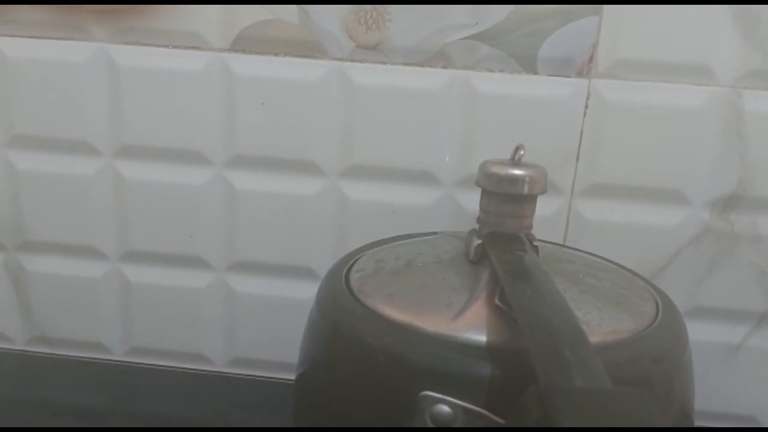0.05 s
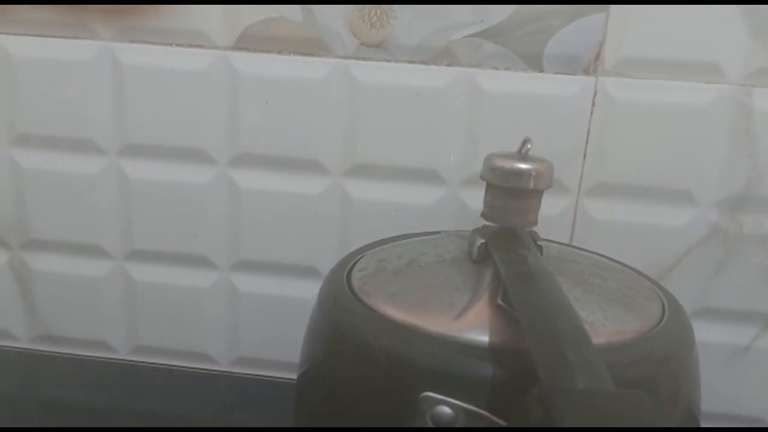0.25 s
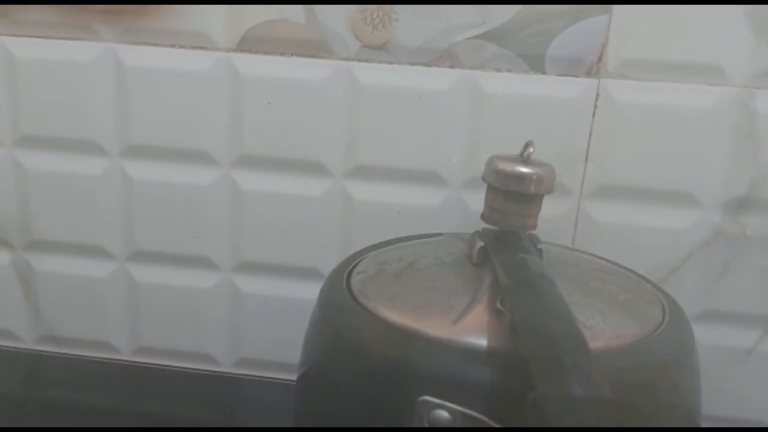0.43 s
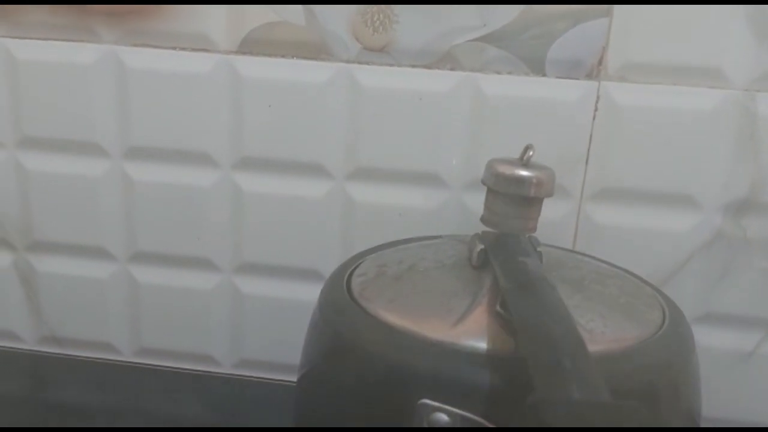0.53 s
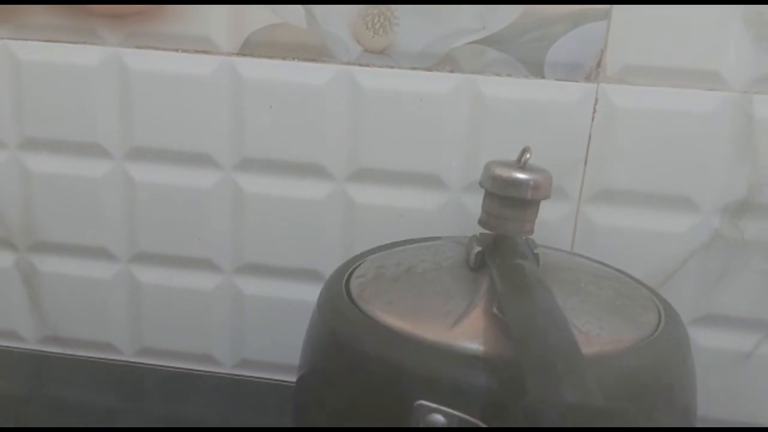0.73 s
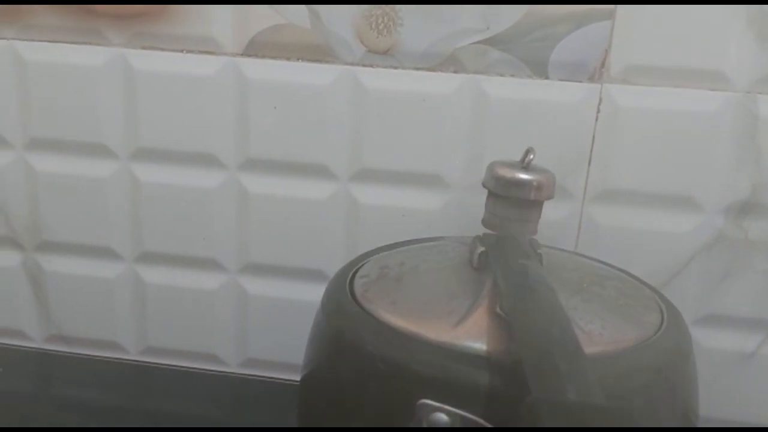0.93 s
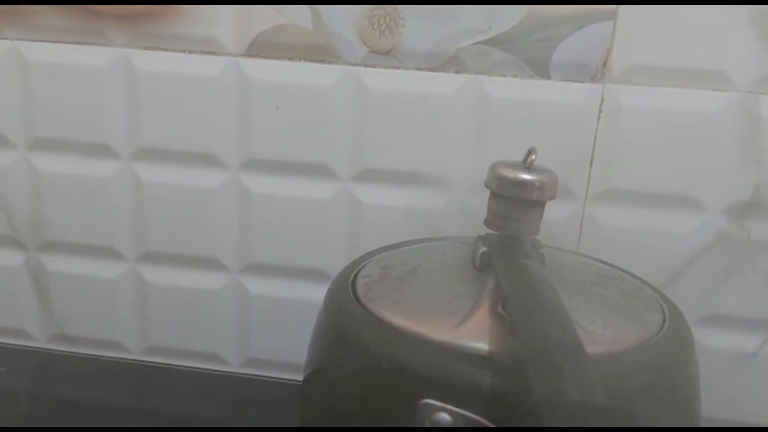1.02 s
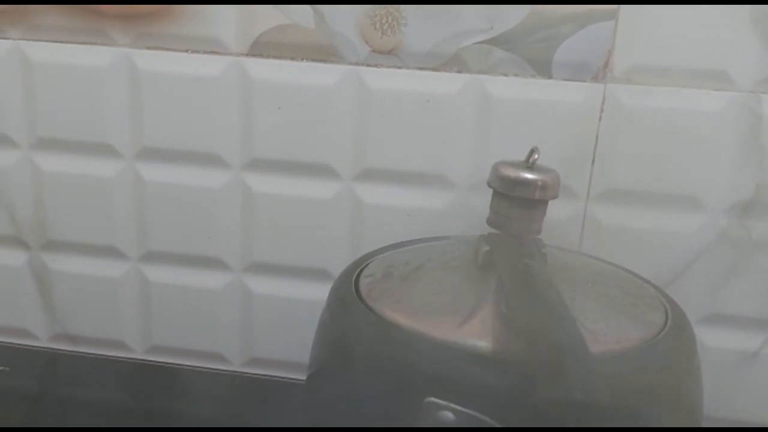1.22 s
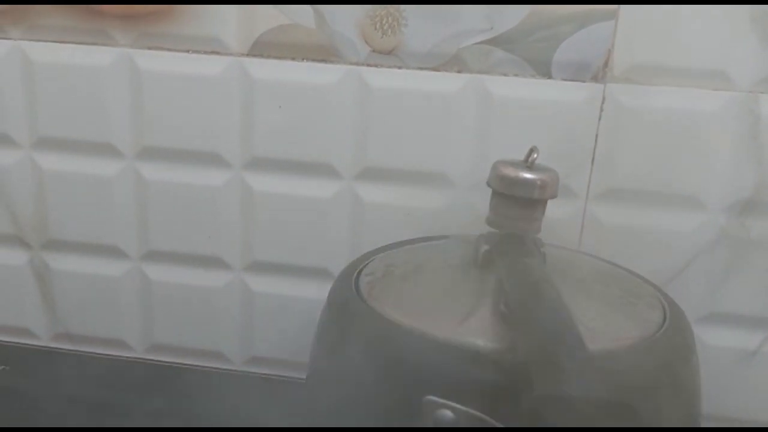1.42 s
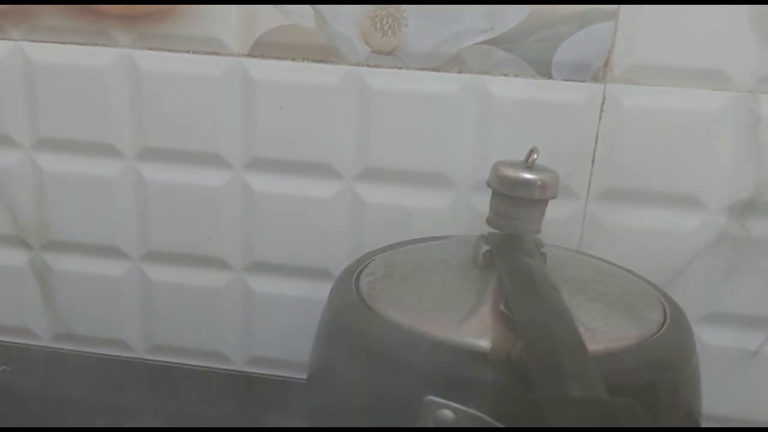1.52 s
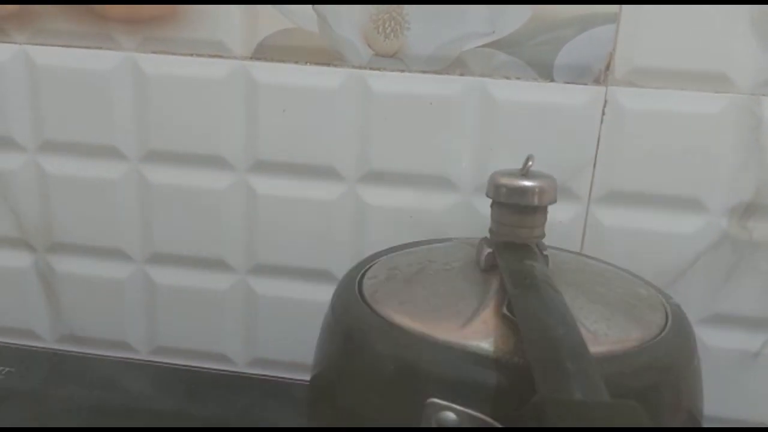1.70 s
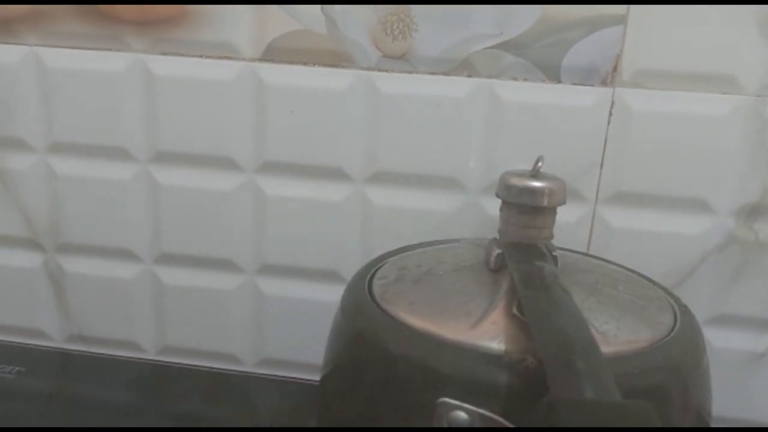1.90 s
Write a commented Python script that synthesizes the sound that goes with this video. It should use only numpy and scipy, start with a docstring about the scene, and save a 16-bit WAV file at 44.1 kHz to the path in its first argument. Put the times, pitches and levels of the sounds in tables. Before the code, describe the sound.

Steam hisses loudly from a pressure cooker valve with a gusty rumble, then shuts off.

```python
"""A steam jet leaves a pressure cooker's vent for a second and a half, as the weight lifts and drops shut.
Its turbulence hisses and excites the cap's resonances; the weight ticks, steam spits, the valve whistles.
The cloud blows over the two microphone ports of a nearby phone, rumbling and thumping mostly on the left.
A thin leak, a quiet kitchen and a faint tone remain."""
import sys
import numpy as np
from scipy import signal
from scipy.fft import rfft, irfft
from scipy.io import wavfile
from scipy.ndimage import uniform_filter1d

SR = 44100
rng = np.random.default_rng(int(sys.argv[2]) if len(sys.argv) > 2 else 0)


def wrap_up_sound(samples):
    """Save the sound to the file named by the first command line argument, as 16-bit audio."""
    columns = np.atleast_2d(samples).T
    # keep every value between -1 and 1, then stretch to whole-number steps
    tamed = np.clip(columns, -1, 1)
    steps = np.round(tamed * 32767).astype(np.int16)
    wavfile.write(sys.argv[1], SR, steps)


N = 85995
TIME_S = np.arange(N) / SR
BIN_HZ = np.arange(N // 2 + 1) * SR / N + 1  # raised 1 Hz to keep logarithms finite
PORT_LAG_S = .00018


def steam_jet():
    """Turbulent mixing radiates broadband hiss; the cap's resonances filter the lower of two layers."""
    # flow through the vent (time [s], relative high hiss level [dB], relative low hiss level [dB])
    flow = [(0.0, -49.5, -49), (0.168, -39, -41.5), (0.194, -31, -35.5), (0.216, -35, -39),
            (0.232, -30.5, -34), (0.248, -31.5, -36), (0.266, -24, -28), (0.276, -29.5, -28),
            (0.296, -19.5, -24), (0.325, -20, -26), (0.355, -15.5, -24), (0.482, -20, -26),
            (0.504, -19, -28.5), (0.65, -17.5, -25), (0.976, -19, -25), (0.994, -20, -29),
            (1.036, -17.5, -24), (1.226, -20, -31), (1.242, -19, -26), (1.548, -19.5, -26),
            (1.564, -19, -24), (1.72, -32.5, -37.5), (1.738, -42, -43), (1.758, -31, -38.5),
            (1.824, -56, -55.5), (1.95, -55, -75)]
    # spectra of the two layers (frequency [Hz], left gain [dB], right gain [dB])
    high_spectrum = [(7460, -24, -24), (8600, -13, -12), (9500, -9, -7), (10200, -6, -1.5), (10600, -4, -3),
                     (11300, 0, 0), (12600, 0.5, 1), (13000, -2, -2), (14000, 0.5, 0.5), (15000, -2, -0.5),
                     (16000, -4, -2.5)]
    low_spectrum = [(208, -3, -3.5), (905, -9.5, -14), (1580, 2.5, -6.5), (2880, -1.5, -3.5), (3450, 2, -1),
                    (5500, 4, -5.5), (6040, -0.5, -1.5), (8200, 4, 1), (9400, -21, -50)]
    # cap resonances (frequency [Hz], bandwidth [Hz], left boost [dB], right boost [dB])
    cap = [(2070, 880, 2.5, 3.5), (4640, 410, 5, 10.5), (7600, 250, 6.5, 3)]
    high = colour(noise(coherence=.71), high_spectrum) * undb(curve(flow, column=1) + 3)
    low = colour(noise(coherence=.39, lag_s=PORT_LAG_S), low_spectrum, cap)
    low *= undb(curve(flow, column=2) + 1.5)
    return flutter(high + low, swell_db=.3, band_db=.7, rate_hz=20, grain_db=1.2, grain_hz=350)


def ticks_and_spits():
    """Ticks of the weight and spits of steam, each a short puff with a brief ring of damped modes."""
    # ticks and spits (time [s], relative level [dB], upper cutoff of the puff [Hz])
    transients = [(0.176, -43, 9000), (0.195, -46, 12000), (.231, -38, 12000), (0.264, -45, 9000),
                  (0.291, -22.5, 6000), (0.348, -21, 12000), (1.36, -18, 4000), (1.57, -18, 4000),
                  (1.636, -25, 3500), (1.73, -30.5, 3000)]
    # modes of the weight (frequency [Hz], relative level [dB], T60 [s])
    modes = [(1005, -8, 0.037), (1606, 0, 0.037), (2270, -5, 0.16), (3030, -7, 0.035)]
    puff_t60_s, out = 0.018, 0
    for start, db, top_hz in transients:
        age = np.clip(TIME_S - start, 0, 1)
        envelope = (TIME_S > start) * undb(db - 4 - 60 * age / puff_t60_s)
        band = signal.butter(2, [800, top_hz], "band", fs=SR, output="sos")
        puff = signal.sosfilt(band, noise(coherence=.43) * envelope)
        ring = sum(np.sin(2 * np.pi * hz * age) * undb(db - 7 + mode_db - 60 * age / t60)
                   for hz, mode_db, t60 in modes)
        out = out + puff + ring
    return out


def port_eddies():
    """Wind noise: eddies in the steam cloud make independent pressure fluctuations at each port."""
    # draught (time [s], relative level [dB], left minus right [dB], relative rumble gain [dB])
    draught = [(0.24, -57, 5, -2), (0.284, -52, 5, -10), (0.334, -42.5, 0, 4), (0.366, -29.5, 9.0, -11),
               (0.4, -23, 13.5, 1), (0.478, -23.5, 9.5, -4), (0.512, -24, 11.5, -3),
               (0.664, -22.5, 6, -5.5), (0.726, -22.5, 10, -3.5), (0.916, -23.5, 10.5, 0),
               (0.982, -23.5, 15, 0.5), (1.088, -24, 6, -3), (1.126, -21, 10.5, -1.5),
               (1.192, -21.5, 11, -0.5), (1.302, -29, -2, 0), (1.356, -25, 4, -8.5), (1.39, -23, 8, -3.5),
               (1.566, -22, 16, -4), (1.582, -24.5, 18.5, 0.5), (1.616, -34.5, 11, -4),
               (1.636, -30.5, 21, -5), (1.654, -46, 12, 0), (1.674, -51, 13, -10), (1.72, -44, 7, -1)]
    # eddy spectrum (frequency [Hz], left gain [dB], right gain [dB])
    spectrum = [(25, -30, -9), (61.3, 1, -3), (258, 0.5, 1), (600, -5.5, -3.5), (1560, -7.5, -6.5),
                (3850, -13.5, -10), (5220, -20, -11), (8400, -44, -23)]
    eddies = np.array([flutter(port, swell_db=.7, band_db=.7, rate_hz=16, grain_db=2, grain_hz=400)
                       for port in colour(noise(coherence=0), spectrum)])
    rumble = signal.sosfiltfilt(signal.butter(2, 300, fs=SR, output="sos"), eddies)
    eddies = eddies - rumble + rumble * undb(curve(draught, column=3) + 1.4)
    pan_db = curve(draught, column=2)
    balance = np.sqrt(1 / (1 + undb([-pan_db, pan_db]) ** 2))  # constant total power
    fade_in = np.clip((TIME_S - draught[0][0]) / 0.054, 0, 1)
    fade_out = np.clip((draught[-1][0] - TIME_S) / 0.061, 0, 1)
    return eddies * balance * fade_in * fade_out * undb(curve(draught, column=1) + 11)


def gust_thumps():
    """Each heavy gust is a low-frequency pressure pulse: a few cycles under a Gaussian envelope."""
    # gusts on the left port (centre time [s], frequency [Hz], level [dB], duration [s])
    gusts = [(0.277, 90.6, -44.5, 0.063), (0.413, 105, -16, .03), (0.627, 60.1, -21.5, 0.045),
             (.84, 60, -20, 0.049), (0.942, 200, -19, 0.046), (0.986, 121.3, -16, 0.044),
             (1.23, 90.5, -30, 0.035), (1.4, 237.7, -16, 0.036), (1.46, 99.3, -19, 0.035),
             (1.592, 84.2, -19.5, 0.028)]
    out = 0
    for (centre, hz, db, duration), phase in zip(gusts, rng.random(len(gusts))):
        envelope = undb(db) * np.exp(-(2 * (TIME_S - centre) / duration) ** 2)
        out = out + envelope * np.sin(2 * np.pi * (hz * TIME_S + phase))
    return out * undb([[0], [-21]])


def valve_whistle():
    """Flow past the edge of the opening valve sings in a narrow band until the jet masks it."""
    # course of the whistle (time [s], frequency [Hz], level [dB])
    course = [(.15, 7500, -62), (.2, 7450, -48), (.232, 7560, -31), (.25, 7570, -45), (.268, 7580, -24),
              (.296, 7430, -45), (.345, 7400, -37), (.36, 7650, -38), (.4, 7450, -38), (.46, 7700, -29),
              (.5, 7550, -42), (.56, 7600, -55)]
    phase = 2 * np.pi * np.cumsum(curve(course, column=1)) / SR
    band = walk(rate_hz=260) * np.sin(phase) + walk(rate_hz=260) * np.cos(phase)
    sounding = (TIME_S > course[0][0]) * (TIME_S < course[-1][0])
    return band * undb(curve(course, column=2)) * sounding * undb([[0], [-2]])


def seat_leak():
    """Turbulence in a thin leak at the seat hisses throughout, louder on the left."""
    # leak spectrum (frequency [Hz], gain [dB])
    spectrum = [(990, -15), (1670, -1.5), (5700, -7), (7800, 7.5), (9000, 6), (10500, 5.5), (13000, -14),
                (16000, -10)]
    hiss = colour(noise(coherence=.089, lag_s=PORT_LAG_S), spectrum)
    return hiss * undb(-49 + 0.58 * walk(rate_hz=14.4)) * undb([[6], [0]])


def kitchen_murmur():
    """Ambient noise of long wavelength reaches both ports nearly alike, with more bass at first."""
    # room spectrum (frequency [Hz], left gain [dB], right gain [dB])
    spectrum = [(25, -22, -21), (100, -17.5, -14), (302, -6.5, -6), (785, -13, -17.5), (1920, -32, -32)]
    # murmur before the added bass (time [s], level [dB])
    levels = [(0, -55.5), (.2, -59), (1.7, -51), (1.82, -57), (1.87, -64), (1.95, -67)]
    murmur = colour(noise(coherence=.85), spectrum) * undb(curve(levels, column=1))
    bass = signal.sosfilt(signal.butter(2, [60, 160], "band", fs=SR, output="sos"), murmur)
    return murmur + bass * undb(13.5) * (TIME_S < 0.975)


def faint_tone(hz=600, waver_hz=60, start_s=1.79, rise_s=0.044):
    """Random modulation of amplitude and phase makes a faint closing tone waver."""
    phase = 2 * np.pi * hz * TIME_S
    tone = np.array([(1 + 0.85 * walk(waver_hz)) * np.sin(phase) + 0.77 * walk(waver_hz) * np.cos(phase)
                     for port in "LR"])
    return tone * np.clip((TIME_S - start_s) / rise_s, 0, 1) * undb(-61)


def undb(db):
    """Amplitude ratio of a level in decibels."""
    return 10 ** (np.asarray(db) / 20)


def curve(table, column):
    """Linear interpolation of a table column over time."""
    rows = np.array(table)
    return np.interp(TIME_S, rows[:, 0], rows[:, column])


def walk(rate_hz):
    """Low-pass random modulation: held values, smoothed twice, with a spread near 1."""
    hold = max(int(SR / rate_hz), 2)
    steps = rng.standard_normal(N)[np.arange(N) // hold]
    return 1.14 * uniform_filter1d(uniform_filter1d(steps, hold), hold)


def noise(coherence, lag_s=0.):
    """Partial coherence: each port has its own noise plus a shared part that may reach the left late."""
    shared, own = rng.standard_normal(N), rng.standard_normal((2, N))
    arrivals = np.array([np.roll(shared, int(lag_s * SR)), shared])
    return np.sqrt(coherence) * arrivals + np.sqrt(1 - coherence) * own


def colour(x, spectrum, resonances=()):
    """Spectral shaping with resonance peaks, at unit overall power gain for white noise."""
    rows = np.array(spectrum)
    db = np.array([np.interp(np.log(BIN_HZ), np.log(rows[:, 0]), rows[:, side], -90, -90)
                   for side in (1, -1)])
    for centre, width, *boost in resonances:
        db = db + np.array(boost)[:, None] / (1 + (2 * (BIN_HZ - centre) / width) ** 2)
    gain = undb(db)
    return irfft(rfft(x) * gain / np.sqrt(np.mean(gain ** 2)), N)


def flutter(x, swell_db, band_db, rate_hz, grain_db, grain_hz):
    """Turbulent modulation: half-octave bands swell together, flicker alone and share a quick grain."""
    spectrum, octave = rfft(x), np.log2(BIN_HZ)
    common_db = swell_db * walk(rate_hz) + grain_db * walk(grain_hz)
    out = 0
    for centre in np.arange(4, 15, .5):
        band = np.clip(1 - 2 * abs(octave - centre), 0, 1)
        out = out + irfft(spectrum * band, N) * undb(common_db + band_db * walk(rate_hz))
    return out


def scene():
    """Superposition of all sources at the left and right ports."""
    blast = steam_jet() + ticks_and_spits() + port_eddies() + gust_thumps() + valve_whistle()
    return blast + seat_leak() + kitchen_murmur() + faint_tone()


def record(dry):
    """Soft saturation in the phone rounds the peaks; a steep low-pass filter limits the bandwidth."""
    ceiling, cutoff_hz = .85, 15770
    low_pass = signal.ellip(14, .2, 100, cutoff_hz, fs=SR, output="sos")
    return signal.sosfilt(low_pass, ceiling * np.tanh(dry / ceiling))


dry = scene()
out = record(dry)
wrap_up_sound(out)
```